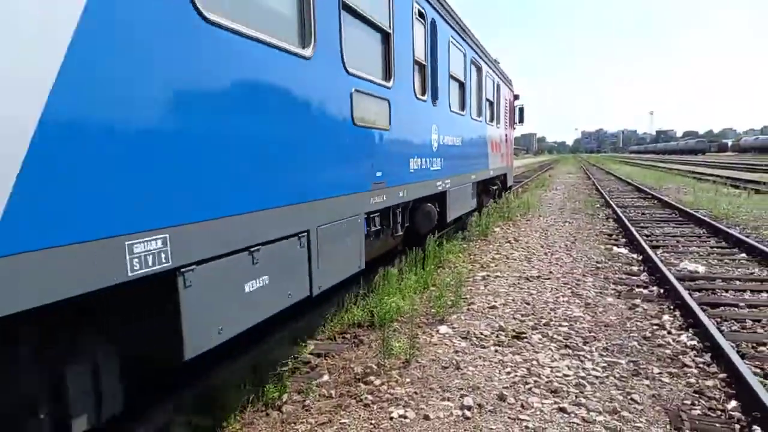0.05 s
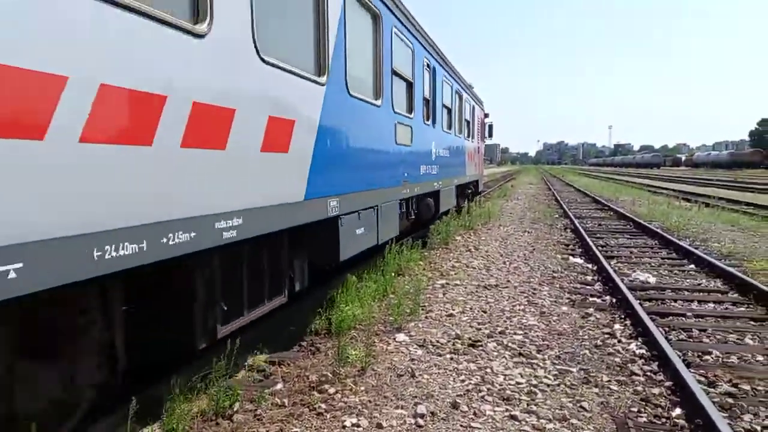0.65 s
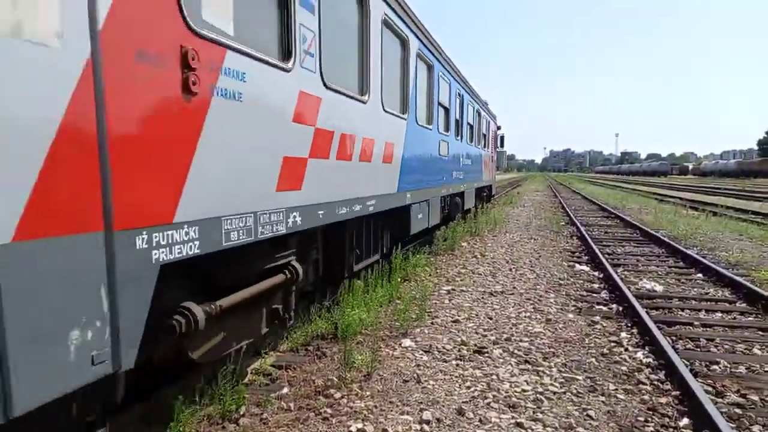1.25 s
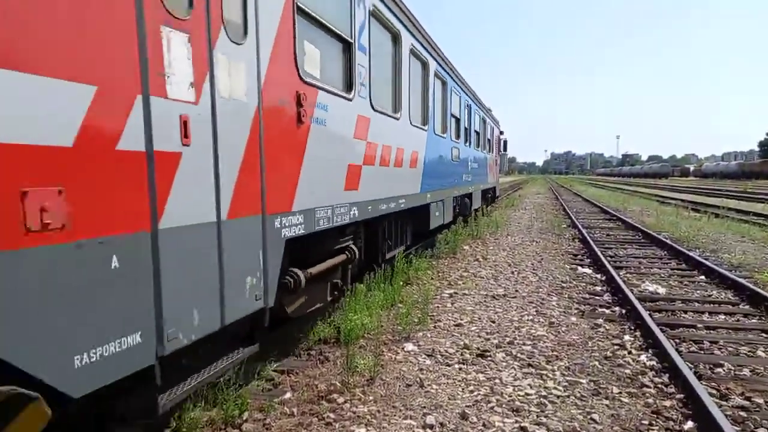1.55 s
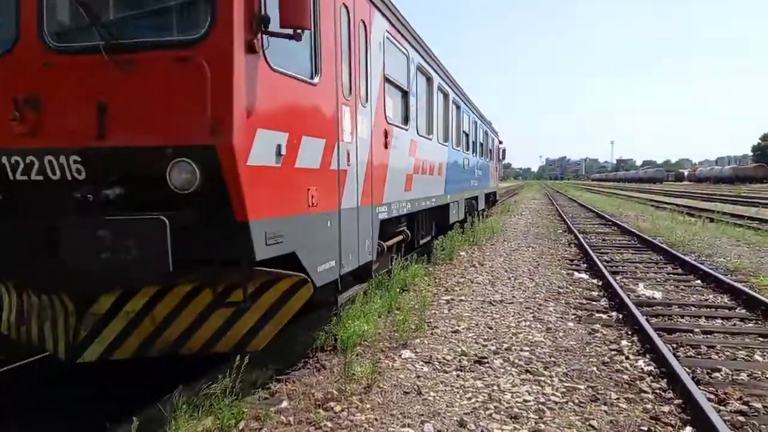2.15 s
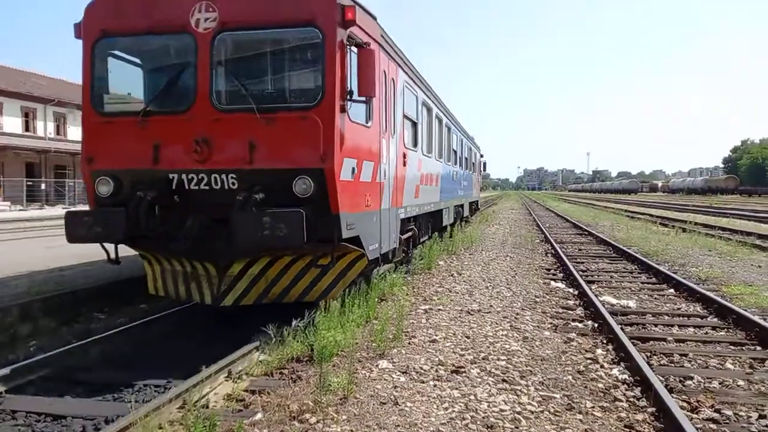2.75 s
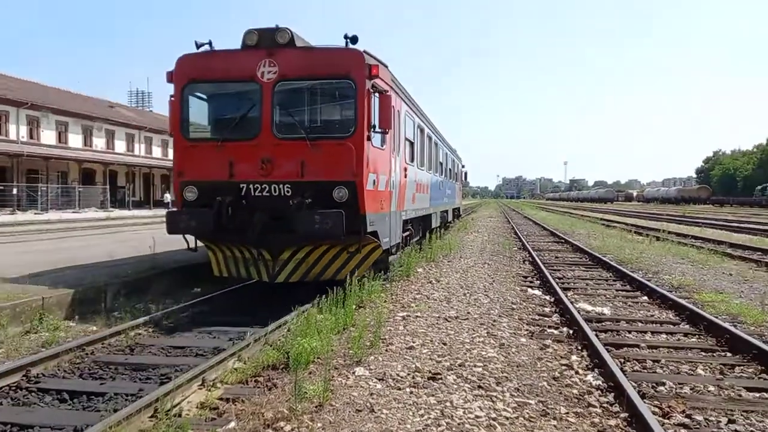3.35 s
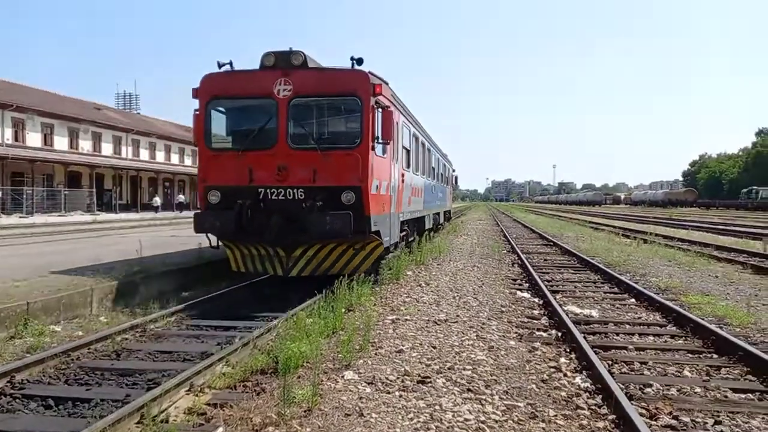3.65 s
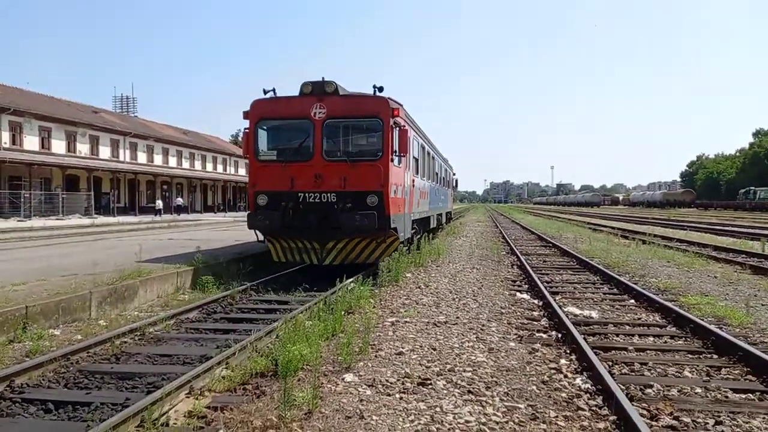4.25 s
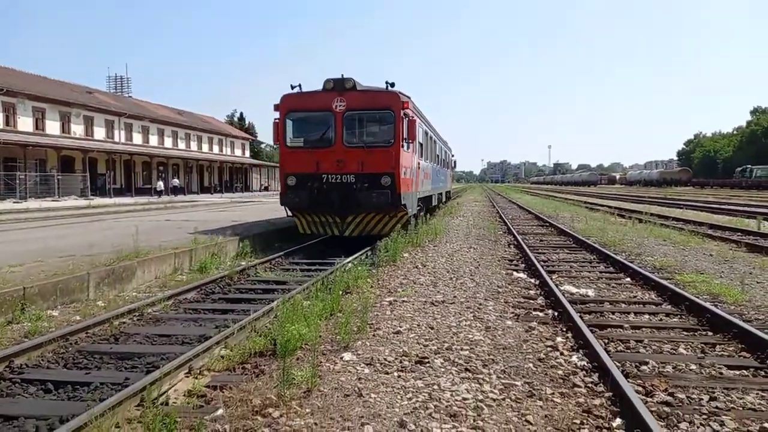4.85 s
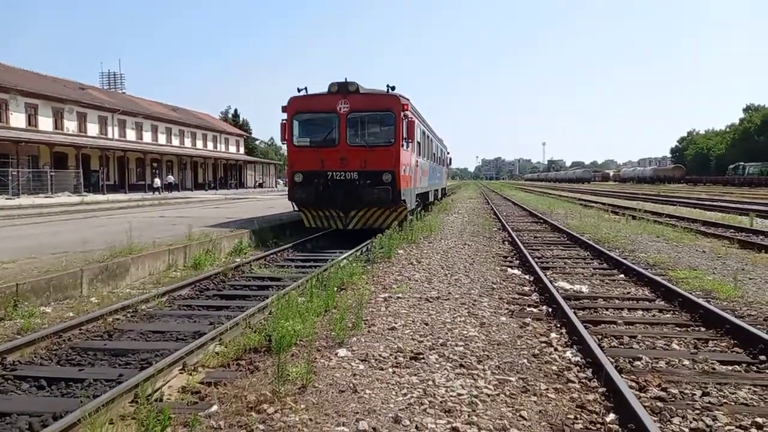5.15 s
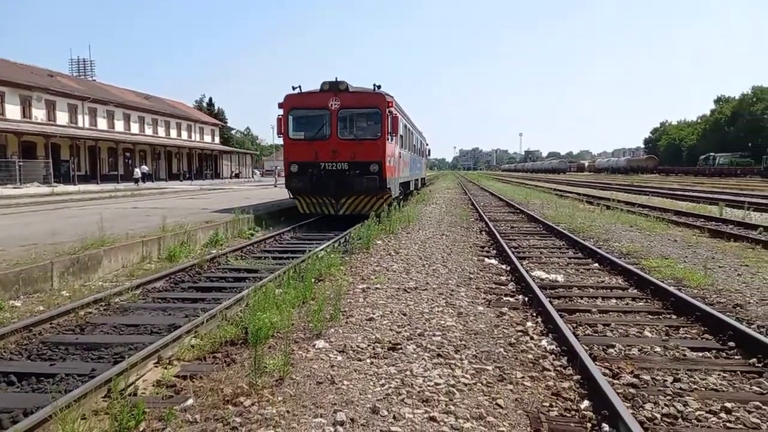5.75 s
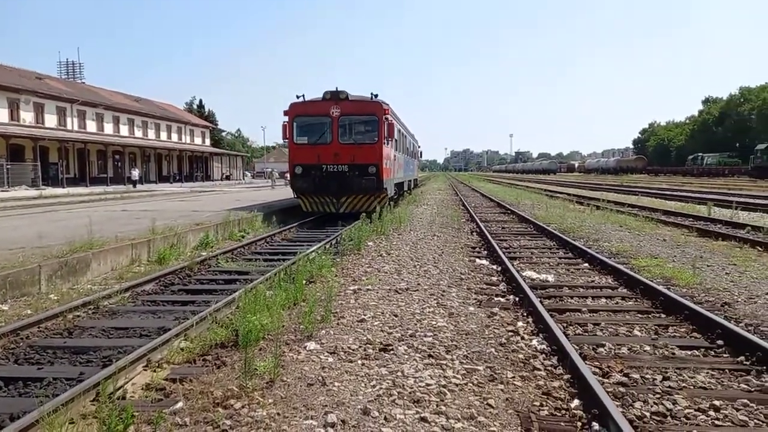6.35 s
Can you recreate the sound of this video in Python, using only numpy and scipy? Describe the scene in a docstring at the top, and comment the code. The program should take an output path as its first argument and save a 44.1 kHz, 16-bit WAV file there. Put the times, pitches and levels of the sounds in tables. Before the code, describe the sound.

A diesel railcar rolls slowly past in an open station yard, very close on the microphone's left. Its engine drones and surges over a chugging exhaust, with metallic clatter, jangling fittings and a brief hiss of air. The wheels roar, ring and knock lightly on the rail. As it draws away the sound softens, a fan's hiss and thin whine emerge, and a faint, high wheel squeal flickers near the end.

```python
"""In a station yard a diesel railcar rolls slowly past on the left, an arm's length away, and draws off. Uneven
cylinder firings drive the resonances of engine and underbody into a drone; the exhaust chugs, the casing
clatters, loose fittings jangle and air hisses. Rail roughness makes the wheels roar and ring. With distance the
levels fall, and the engine's pitch sags as it slows. A fan's hiss and thin whine emerge behind the car, and
friction between flange and rail raises a faint squeal."""
import sys
import numpy as np
from scipy import signal
from scipy.fft import rfft, irfft
from scipy.io import wavfile
from scipy.ndimage import uniform_filter1d, map_coordinates

SR = 44100
rng = np.random.default_rng(int(sys.argv[2]) if len(sys.argv) > 2 else 0)


def store_pcm(level_fs):
    """Save levels as 16-bit WAV."""
    pcm = np.round(np.clip(level_fs, -1, 1) * 32767).astype(np.int16)
    wavfile.write(sys.argv[1], SR, np.atleast_2d(pcm).T)


N = 291501
T = np.arange(N) / SR
F = np.arange(N // 2 + 1) * SR / N + 1e-3  # Hz, kept just above zero

# direction of the car: (time [s], lag of the right channel [ms], left minus right level [dB])
BEARING = [(0, 0.37, -1), (.6, 0.38, -1.5), (1.1, 0.34, -1), (1.85, 0.2, -1), (2.2, 0.06, -1.5),
           (3.2, 0.072, -1.5), (6.61, 0.06, -1.5)]
# modes of wheel and rail: (frequency [Hz], width [Hz], gain [dB])
WHEEL_MODES = [(930, 16, -6), (1156, 59, 4), (1570, 430, 5), (1830, 33, 6), (2412, 130, 6.5),
               (3080, 120, 0.5), (3745, 100, 3.5)]
# rough stretches of rail: (time [s], half length [s], rise in singing [dB], rise in roar [dB])
GRINDS = [(1.455, 0.034, 3, 1), (1.673, 0.08, 8.5, 2), (2.53, 0.025, -5, 3.5), (2.853, 0.049, -2, 3.5),
          (3.706, 0.15, 5, 4), (4.05, .06, 7, 2), (4.342, 0.13, 6, 1.5), (4.8, 0.021, 13, 2),
          (4.987, 0.073, 7, 3), (5.27, 0.036, -9, 5.5), (5.732, .05, 11, 0.5), (6.092, 0.055, 14, -0.5)]


def undb(db):
    """Amplitude ratio of a level in decibels."""
    return 10 ** (np.asarray(db) / 20)


def curves(table):
    """Linear interpolation in time: one curve for each column after the first."""
    times, *columns = np.transpose(table)
    return [np.interp(T, times, column) for column in columns]


def unit(x):
    """Normalisation to rms 1."""
    return x / np.sqrt(np.mean(x ** 2))


def bell(s, half_s):
    """Gaussian envelope that peaks at 1 at time s."""
    return np.exp(-((T - s) / half_s) ** 2 / 2)


def walk(rate):
    """Random modulation: values held for 1 / rate seconds and smoothed twice; rms 1."""
    hold = int(SR / rate)
    held = rng.standard_normal(N)[np.arange(N) // hold]
    return unit(uniform_filter1d(uniform_filter1d(held, hold), hold))


def steady(x, span_s):
    """Envelope flattening: division by the running rms evens out the power."""
    power = uniform_filter1d(np.atleast_2d(x) ** 2, int(span_s * SR) + 1).mean(axis=0)
    return unit(x / np.sqrt(power + 1e-9))


def colour(x, points, peaks=()):
    """Spectral shaping: a broad envelope with Lorentzian resonance peaks on it; rms 1."""
    hz, db = np.transpose(points)
    gain_db = np.interp(np.log(F), np.log(hz), db)
    for centre, width, rise in peaks:
        gain_db = gain_db + rise / (1 + (2 * (F - centre) / width) ** 2)
    skirts = np.minimum(F / hz[0], 1) ** 2 * np.minimum(hz[-1] / F, 1) ** 2
    return unit(irfft(rfft(x) * undb(gain_db) * skirts, N))


def ring(x, modes):
    """Forced resonance: each mode responds as two resonators in series; rms 1."""
    response = sum(undb(db) / (1 + 1j * hz / (1.175 * width) * (F / hz - hz / F)) ** 2
                   for hz, width, db in modes)
    return unit(irfft(rfft(x) * response, N))


def flickering_modes(x, modes, depth_db, rate):
    """Forced resonance in which the level of each mode fluctuates independently."""
    return sum(ring(x, [(hz, width, 0)]) * undb(db + depth_db * walk(rate)) for hz, width, db in modes)


def patchy(x, depth_db, rate):
    """Amplitude modulation by band: each flickers on its own, while the top band stays smooth."""
    spectrum = rfft(x)
    band = np.digitize(F, np.geomspace(1500, 9000, num=13))
    top = irfft(spectrum * (band == band.max()), N)
    lower = sum(irfft(spectrum * (band == k), N) * undb(depth_db * walk(rate))
                for k in np.unique(band)[:-1])
    return unit(top + lower)


def wander(x, spread, rate):
    """Frequency modulation: the pitch strays by a small fraction as the contact shifts."""
    stray = walk(rate)
    index = np.cumsum(1 + spread * (stray - stray.mean()))
    return np.array([map_coordinates(channel, [index], order=3, mode="mirror") for channel in x])


def delayed(x, ms):
    """Propagation delay that varies with time."""
    return map_coordinates(x, [np.arange(N) - ms * SR / 1000], order=3, mode="nearest")


def place(x, abreast=1):
    """Time and level cues of direct sound: it reaches the left first, the more so the further abreast."""
    lag_ms, pan_db = curves(BEARING)
    return np.array([x * undb(pan_db / 2), delayed(x, lag_ms * abreast) * undb(-pan_db / 2)])


def scattered(gap_m=0.17):
    """Diffuse noise at two points: coherent in the bass, unrelated in the treble."""
    coherence = .9 * np.sinc(2 * F * gap_m / 343)
    mid, side = irfft(rfft(rng.standard_normal((2, N))) * np.sqrt([1 + coherence, 1 - coherence]), N)
    return unit(np.array([mid + side, mid - side]))


def field(scatter_db, abreast=1):
    """Superposition of direct noise and noise scattered by ballast and underbody."""
    pan_db = curves(BEARING)[1]
    echoes = scattered() * undb(np.array([pan_db, -pan_db]) / 4)
    return unit(place(rng.standard_normal(N), abreast) + undb(scatter_db) * echoes)


def passing(db, ahead_m, nearest_m, doubling_db, screen_db):
    """Spreading loss and screening: the level [dB] of a source ahead_m in front of the car's rear end."""
    speed_m_s, rear_passes_s, fade_s = 3.71, 1.476, 0.15
    along_m = ahead_m + speed_m_s * (T - rear_passes_s)
    doublings = np.log2(np.hypot(along_m, nearest_m) / nearest_m)
    screened = np.clip((T - rear_passes_s) / fade_s, 0, 1)
    return db - doubling_db * doublings - screen_db * screened


def ground(x, rough_hz=4200):
    """Interference: an inverted grazing reflection hollows the sound; ballast scatters its top away."""
    # ground reflection: (time [s], extra delay [ms], amplitude relative to direct sound [ratio])
    reflection = [(0, 1.42, 0.02), (1.2, 1.48, 0.2), (2.1, 1.51, .6), (3.6, 1.555, .55), (6.61, 1.575, .52)]
    ms, share = curves(reflection)
    bounced = irfft(rfft(x) / (1 + (F / rough_hz) ** 6), N)
    return np.array([direct - share * delayed(back, ms) for direct, back in zip(x, bounced)])


def firings(engine_speed, nominal_hz=34.23, jitter=.14, spread_db=4.5, decay_cycles=0.3):
    """Pulse excitation: each uneven cylinder firing is a jump in pressure and an exponential decay."""
    cycles = np.cumsum(nominal_hz * engine_speed * (1 + jitter * walk(40))) / SR
    strength = undb(spread_db * rng.standard_normal(size=1024))[cycles.astype(int)]
    return unit(strength * np.exp(-(cycles % 1) / decay_cycles))


def drone(pressure, pitch, modes, db, gas_db=2, diffuse_db=-9):
    """Forced vibration: firings and turbulent gas drive a set of modes, shifted by the pitch factor."""
    knocks = ring(np.diff(pressure, prepend=pressure[0]), modes)
    gas = undb(gas_db) * ring(pressure * rng.standard_normal(N), modes)
    evened = steady(knocks + gas, span_s=0.036)  # the flywheel evens out the power between cycles
    shifted = np.interp(np.cumsum(pitch), np.arange(N), evened)
    return (place(shifted) + undb(diffuse_db) * ring(scattered(), modes)) * undb(db)


def engine(pressure, engine_speed, lope_db=1.3, lope_rate=22):
    """Structural resonance: boom and upper drone surge and sag in pitch; the gearbox modes stay put."""
    # modes of underbody, engine and gearbox: (frequency [Hz], width [Hz], gain [dB])
    boom_modes = [(148.8, 27.8, 10.5), (109.6, 56, -2), (182, 50, -1.5), (89, 76, -10.5)]
    upper_modes = [(228, 16, -.5), (243, 14, 0), (310, 60, -19)]
    gearbox_modes = [(387, 31, 5), (481, 65, -8.5)]
    # surges: (time [s], half length [s], rise in boom [dB], rise in upper drone [dB])
    surges = [(0.432, 0.063, 5, -0.5), (0.684, 0.041, 3.5, 8), (0.826, 0.036, 4.5, 9.5),
              (1.142, 0.069, 9, 3), (1.368, 0.029, 0.5, 5), (1.578, 0.034, 6, -2), (1.754, 0.026, 10, 8),
              (1.946, 0.026, 4, 5), (2.108, 0.049, 6.5, 9), (2.294, 0.06, -0.5, 6), (2.437, 0.021, -8, 8.5),
              (2.555, 0.05, 2, 6), (2.708, 0.037, 4.5, 11.5), (3.031, 0.028, -4, 13.5),
              (3.346, 0.088, 6, 6), (3.632, 0.0165, 2, 9), (3.82, 0.017, 12, 5), (4.387, 0.036, 9, 7.5),
              (4.642, 0.014, 4, 8), (4.862, 0.025, 6, -7), (5.24, 0.076, -4, 9), (5.883, 0.011, 2, 13),
              (6.555, 0.031, -10, 11)]
    # gearbox hum: (time [s], level [dB])
    gearbox_level = [(0, -33), (.45, -35.5), (1, -31.5), (1.5, -42.5), (2.1, -42), (2.8, -45), (3.5, -51),
                     (4.5, -56.5), (6.61, -70)]
    boom_db = passing(-26.5, ahead_m=3, nearest_m=1.97, doubling_db=6.5, screen_db=0.5)
    boom_db += sum(db * bell(s, half_s) for s, half_s, db, _ in surges)
    upper_db = passing(-28, ahead_m=2.5, nearest_m=4, doubling_db=9, screen_db=1.7)
    upper_db += sum(db * bell(s, half_s) for s, half_s, _, db in surges)
    layers = [(boom_modes, engine_speed, boom_db), (upper_modes, engine_speed, upper_db),
              (gearbox_modes, np.ones(N), curves(gearbox_level)[0])]
    return sum(drone(pressure, pitch, modes, db + lope_db * walk(lope_rate))
               for modes, pitch, db in layers)


def exhaust(rise_s=0.0089, dull_db_per_s=1.8):
    """Pulsating gas flow: a throbbing rumble and uneven chuffs; far off, the pipe's resonance leads."""
    # spectra of rumble and chuffs: (frequency [Hz], relative density [dB])
    rumble_spectrum = [(20, -14), (30, -6.5), (42, -5), (60, 0.5), (85, -0.5), (120, -1.5), (175, -11.5),
                       (225, -1.5), (300, -10), (450, -18), (900, -61)]
    chuff_spectrum = [(25, -30), (55, -10), (90, 6.5), (140, -3.5), (180, -4.5), (235, -14.5), (300, -12.5),
                      (450, -23.5), (1000, -27), (3000, -58)]
    # tailpipe modes: (frequency [Hz], width [Hz], gain [dB])
    pipe_modes = [(77, 49, 0), (169, 66, -9.5)]
    # puffs of gas: (time [s], relative level [dB], length [s])
    chuffs = [(.08,-32,.06), (.203,-27,.05), (.35,-30,.05), (.475,-27,.075), (.63,-27,.06), (.72,-26.5,.06),
              (.853,-26,.1), (1.146,-29,.06), (1.235,-28,.04), (1.33,-28,.13), (1.565,-29,.07),
              (1.69,-32,.05), (1.775,-31,.04), (1.905,-25.5,.055), (2.05,-29.5,.085), (2.203,-26.5,.035),
              (2.255,-30,.04), (2.52,-31,.025), (2.59,-29,.065), (2.808,-27,.03), (2.868,-27.5,.06),
              (3.025,-28.5,.04), (3.11,-34,.025), (3.192,-25,.035), (3.275,-29,.035), (3.337,-24.5,.028),
              (3.425,-28,.03), (3.512,-27,.068), (3.6,-31,.06), (3.755,-28.5,.065), (3.94,-35,.04),
              (4.015,-37,.035), (4.132,-29.5,.085), (4.315,-37,.03), (4.39,-34,.04), (4.55,-32,.04),
              (4.645,-35,.075), (4.8,-34,.03), (4.843,-28.5,.035), (4.97,-38,.04), (5.048,-36,.035),
              (5.19,-35,.055), (5.325,-35,.08), (5.485,-34.5,.04), (5.603,-32,.045), (5.708,-33,.055),
              (5.893,-35.5,.035), (5.96,-37.5,.028), (6.045,-32.5,.1), (6.408,-32.5,.04), (6.54,-36.5,.08)]
    gas = lambda: place(rng.standard_normal(N)) + undb(-1.5) * rng.standard_normal((2, N))
    envelope = np.zeros(N)
    for s, db, length_s in chuffs:
        age = np.clip(T - s, 0, 2 * length_s)
        envelope += undb(db) * np.minimum(age / rise_s, 1) * np.exp(-(age / length_s) ** 4)
    rumble_db = passing(-33, ahead_m=-7, nearest_m=1, doubling_db=2.5, screen_db=0.5)
    rumble = steady(colour(gas(), rumble_spectrum), 0.035) * undb(rumble_db + 0.5 * walk(21))
    away_db = dull_db_per_s * np.maximum(T - 3.5, 0)
    chuff = steady(colour(gas(), chuff_spectrum), 0.0234) * undb(-away_db)
    boom = steady(ring(gas(), pipe_modes), .03) * undb(away_db - 4)
    return rumble + (chuff + boom) * envelope


def clatter(pressure, beat_depth=0.18, crossover_hz=3000):
    """Structure-borne noise: injectors and valve gear rattle the casing in time with the firings."""
    # rattle: (frequency [Hz], relative density [dB])
    spectrum = [(900, -18), (1800, -2.5), (2400, 2), (3200, 0.5), (4200, 0), (5300, -5.5), (6500, -8),
                (7900, -9), (9300, -14), (12500, -17.5), (15500, -25)]
    # casing resonances: (frequency [Hz], width [Hz], rise [dB])
    casing_peaks = [(2290, 300, 2.5), (3564, 51, 5.5), (3813, 90, 7), (4100, 19, 8), (4490, 70, 7),
                    (4840, 41, 1), (7560, 200, 2)]
    # the lower rattle comes more directly, the treble after bouncing about under the floor
    low_share = 1 / (1 + (F / crossover_hz) ** 4)
    noise = irfft(rfft(field(-0.5)) * np.sqrt(low_share) + rfft(field(18)) * np.sqrt(1 - low_share), N)
    rattle = colour(noise * (1 + beat_depth * pressure), spectrum, casing_peaks)
    level_db = passing(-28.5, ahead_m=3.5, nearest_m=1.33, doubling_db=5, screen_db=0.5)
    return patchy(rattle, depth_db=2, rate=55) * undb(level_db)


def jangle(steel_db, low_hz=2050, high_hz=5200, rise_s=.002, decay_s=0.042, range_db=8, count=600):
    """Damped free vibration: loose fittings tap at random, each tap ringing at its own pitch."""
    age = T[:SR // 8]
    envelope = np.minimum(age / rise_s, 1) * np.exp(-age / decay_s)
    taps = np.zeros((2, N + len(age)))
    for when, pitch, size, right_phase in rng.random((count, 4)):
        start, hz = int(when * N), low_hz * (high_hz / low_hz) ** pitch
        tone = np.sin(2 * np.pi * (hz * age + np.array([[0], [right_phase]])))
        taps[:, start:start + len(age)] += undb(range_db * size) * low_hz / hz * envelope * tone
    return unit(taps[:, :N]) * undb(steel_db - 4)


def ringing(steel_db):
    """Modal vibration of shaken steel under the floor: the energy shifts from mode to mode."""
    # underfloor steel: (frequency [Hz], width [Hz], relative level [dB])
    steel_modes = [(2340, 130, -9), (2607, 37, 6.5), (2850, 87, -3), (3235, 130, 3.5), (3805, 290, 0),
                   (4194, 18, -8), (4540, 44, -16), (5130, 140, -2.5)]
    shaken = flickering_modes(field(-4), steel_modes, depth_db=1, rate=24)
    return steady(shaken, 0.047) * undb(steel_db)


def cooling_fan(waver=0.01184, rasp=0.51):
    """Broadband and tonal fan noise: an uneven hiss through the cowl over a thin, wavering whine."""
    # hiss: (frequency [Hz], relative density [dB])
    spectrum = [(900, -10), (1500, -7), (2100, -3), (2400, -16), (2570, -17), (2850, -4), (3130, -1),
                (3500, 4), (3900, 4), (4300, -8.5), (5000, -8), (7500, -5), (9500, -14), (13000, -20)]
    # cowl resonances: (frequency [Hz], width [Hz], rise [dB])
    cowl_peaks = [(1700, 90, -3.5), (3220, 160, 8.5), (4500, 250, 4), (5250, 160, 1), (5650, 970, 1.5),
                  (6670, 1200, -3.5), (7950, 580, 2.5)]
    # the hiss as the fan comes into view behind the car: (time [s], level [dB])
    hiss_level = [(0, -63), (1.3, -79), (2.5, -43), (3.15, -46.5), (3.65, -42), (4.3, -45), (5.03, -43),
                  (5.3, -44.5), (5.7, -44.5), (6.61, -47.5)]
    # whine: (time [s], frequency [Hz], level [dB])
    whine_track = [(0, 532, -63), (2, 493.3, -53), (3.6, 497.4, -50), (4.6, 497, -48.5),
                   (5.25, 494.7, -49.5), (6.61, 497, -53)]
    hz, whine_db = curves(whine_track)
    cycles = np.cumsum(hz * (1 + waver * walk(50))) / SR
    whine = np.sin(2 * np.pi * cycles) * (1 + rasp * walk(45))
    hiss = patchy(colour(field(3.2), spectrum, cowl_peaks), depth_db=1.75, rate=40)
    return hiss * undb(curves(hiss_level)[0] + 1.3 * walk(9)) + place(whine * undb(whine_db))


def air_hiss():
    """Flow noise: air hisses under the floor alongside, flares at the car's rear end and stops short."""
    # hiss: (frequency [Hz], relative density [dB])
    spectrum = [(4000, -4), (7500, 0), (9500, -2), (12500, -5), (15500, -9)]
    # its course: (time [s], level [dB])
    hiss_level = [(0, -58), (.4, -42.5), (.78, -51), (.88, -61), (1.35, -54), (1.69, -46), (1.73, -62),
                  (1.8, -90)]
    return colour(field(11), spectrum) * undb(curves(hiss_level)[0] + 1.3 * walk(34))


def wheel_roar(roar_db, leave_s=2.32, gone_s=3.02):
    """Rolling noise: rail roughness roars in the bogies and grows duller with distance."""
    # roar from near and from far: (frequency [Hz], relative density [dB])
    near_spectrum = [(150, 8), (330, 3), (480, -3.5), (560, -5), (660, -0.5), (820, -1), (1050, -3),
                     (1300, -7), (1800, -6.5), (2600, -19), (6000, -40)]
    far_spectrum = [(150, -17), (320, -6.5), (440, -1), (620, 6.5), (790, 6.5), (920, -6), (1020, 0),
                    (1400, -9), (1900, -7), (3000, -53), (6000, -39)]
    far_share = np.clip((T - leave_s) / (gone_s - leave_s), 0, 1)
    near = colour(field(-7, abreast=.75), near_spectrum) * np.sqrt(1 - far_share) * undb(5)
    far = colour(field(-6, abreast=1.1), far_spectrum) * np.sqrt(far_share) * undb(1)
    return (near + far) * undb(roar_db + .7 * walk(20))


def wheel_singing(settled_s=2.9, fade_db_per_s=32, rest_db=-6):
    """Resonance of wheel and rail: they sing while near, then settle, and flare where they grind."""
    level_db = passing(-37.5, ahead_m=2, nearest_m=4, doubling_db=6.5, screen_db=3.1)
    level_db += np.clip((settled_s - T) * fade_db_per_s, rest_db, 0)
    level_db += sum(db * bell(s, half_s) for s, half_s, db, _ in GRINDS)
    singing = wander(ring(field(2.3), WHEEL_MODES), spread=0.00808, rate=14)
    return singing * undb(level_db + walk(24.78))


def grit(roar_db):
    """Crushing noise: grit under the wheels gives a fine high hiss that follows their roar."""
    # hiss: (frequency [Hz], relative density [dB])
    spectrum = [(7000, -0.5), (9500, -8), (12500, 3), (15500, -13)]
    return colour(field(10), spectrum) * undb(roar_db - 17)


def growl():
    """Frame resonance: the bogie growls in its own modes as it rolls by."""
    # bogie frame: (frequency [Hz], width [Hz], gain [dB])
    bogie_modes = [(810, 50, 0), (894, 61, -1), (995, 52, -0.52)]
    # growl: (time [s], level [dB])
    growl_level = [(0, -46), (.5, -40), (1.05, -34), (1.3, -37), (1.47, -34), (1.75, -46), (2.8, -49.5),
                   (3.3, -56), (6.61, -75)]
    return ring(field(0, abreast=0.44), bogie_modes) * undb(curves(growl_level)[0] + 1.5 * walk(25))


def pings(waver=.0035, rasp=.6, phase_spread_rad=1.3):
    """Single modes of steel sing out for an instant; echoes put the two channels out of phase."""
    # tones of underfloor steel and wheels: (time [s], frequency [Hz], level [dB], half length [s])
    notes = [(0.276, 3900, -37, .03), (0.317, 5190, -38.5, 0.027), (0.46, 4270, -27, 0.026),
             (0.548, 2594, -33, 0.035), (0.867, 2610, -28.5, 0.018), (1.04, 5170, -42, 0.027),
             (1.11, 5160, -42, 0.022), (1.2, 1496, -41, 0.021), (2.057, 1500, -42, .02),
             (2.28, 1806, -43, .045), (2.396, 3080, -46, 0.05), (2.522, 1830, -40.5, 0.02),
             (2.717, 1830, -40, 0.032), (2.893, 1841, -44, .025)]
    wavering_s = np.cumsum(1 + waver * walk(89.2)) / SR
    phase = phase_spread_rad * np.array([walk(25.1), walk(24.6)])
    tones = sum(np.sin(2 * np.pi * hz * wavering_s + phase) * undb(db) * bell(s, half_s)
                for s, hz, db, half_s in notes)
    return tones * (1 + rasp * walk(150)) * undb(-1)


def rubbed_steel(events, width_hz, scatter_db):
    """Frictional excitation: each event swells and fades in one narrow resonance."""
    rub = field(scatter_db)
    tone = lambda hz: steady(ring(rub, [(hz, width_hz, 0)]), 2 / width_hz)
    return sum(tone(hz) * undb(db) * bell(s, half_s) for s, hz, db, half_s in events)


def scrapes():
    """Sliding friction: the wheels chafe in short bursts of narrow-band noise."""
    # scrapes: (time [s], frequency [Hz], level [dB], half length [s])
    events = [(.32, 2290, -34, 0.046), (.5, 3800, -30, .025), (.54, 2630, -34, .035),
              (.62, 2390, -40, 0.035), (.655, 3520, -31, 0.018), (.7, 2080, -38, 0.041),
              (1.645, 1610, -35, 0.04), (2.53, 1480, -46, 0.028)]
    return rubbed_steel(events, width_hz=220, scatter_db=2)


def clacks(rise_s=0.0029, decay_s=0.017):
    """Impact excitation: a wheel knocks over a flaw in the rail, with a crack that rings its modes."""
    # impacts: (time [s], level [dB])
    impacts = [(1.635, -39), (2.508, -34.5), (2.8, -39)]
    # crack: (frequency [Hz], relative density [dB])
    spectrum = [(700, -8), (2000, 0), (5000, -10), (14000, -24)]
    ages = [(np.maximum(T - s, 0), db) for s, db in impacts]
    envelope = sum(undb(db) * np.minimum(age / rise_s, 1) * np.exp(-age / decay_s) for age, db in ages)
    noise = field(0)
    return unit(colour(noise, spectrum) + undb(2) * ring(noise, WHEEL_MODES)) * envelope


def chirr(db=-58.5, from_s=3.3, rise_s=.15):
    """Light flange friction keeps high wheel modes chirring once the car has drawn clear."""
    # high wheel modes: (frequency [Hz], width [Hz], relative level [dB])
    high_modes = [(6690, 70, 4), (7700, 170, -5)]
    chirring = flickering_modes(field(0), high_modes, depth_db=2.5, rate=45)
    return unit(chirring) * undb(db) * np.clip((T - from_s) / rise_s, 0, 1)


def squeal(waver=0.007, flutter_db=1.5):
    """Friction-driven vibration: a flange rubs the rail in a thin rasping tone that flares and slips."""
    # rubbing flange: (time [s], frequency [Hz], level between bursts [dB])
    flange_track = [(3.2, 8000, -85), (3.4, 8000, -70), (5, 7800, -68), (5.3, 8180, -49.5),
                    (5.45, 8240, -58), (6.61, 8230, -64)]
    # bursts of the tone: (time [s], level [dB], half length [s])
    bursts = [(3.442, -54, .04), (3.57, -57, .03), (4.342, -65, .04), (4.66, -67, .03), (4.8, -53, 0.021),
              (5.134, -61, .03), (5.306, -51, 0.019), (5.395, -51, 0.024), (5.618, -60, 0.033),
              (5.75, -55, 0.019), (5.87, -62, 0.04), (6.227, -51, 0.017), (6.365, -53, 0.028),
              (6.478, -53, .015)]
    # rough slips: (time [s], frequency [Hz], level [dB], half length [s])
    slips = [(5.932, 8360, -43.5, 0.018), (5.99, 8020, -36.5, 0.012), (6.08, 8080, -48, 0.081),
             (6.528, 8030, -46, 0.025), (6.603, 7950, -32.5, 0.0081)]
    hz, rub_db = curves(flange_track)
    tone = np.sin(2 * np.pi * np.cumsum(hz * (1 + waver * walk(550))) / SR)
    envelope = undb(rub_db) + sum(undb(db) * bell(s, half_s) for s, db, half_s in bursts)
    envelope *= undb(flutter_db * walk(60))
    rasping = tone * (1 + walk(220))
    return place(rasping * envelope, abreast=0.46) + rubbed_steel(slips, width_hz=300, scatter_db=3)


def scene():
    """Superposition: engine, exhaust, fan and wheels move off together."""
    # engine speed: (time [s], pitch factor [ratio])
    engine_speed_track = [(0, 1), (.8, 1), (1.3, 1.02), (2.2, .97), (6.61, .935)]
    engine_speed = curves(engine_speed_track)[0]
    pressure = firings(engine_speed)
    steel_db = passing(-38.5, ahead_m=2.5, nearest_m=0.97, doubling_db=4.5, screen_db=8)
    roar_db = passing(-30.5, ahead_m=3.5, nearest_m=1.96, doubling_db=5, screen_db=1.5)
    roar_db += sum(db * bell(s, half_s) for s, half_s, _, db in GRINDS)
    machinery = ground(clatter(pressure) + jangle(steel_db) + ringing(steel_db) + cooling_fan())
    air = air_hiss()
    rolling = wheel_roar(roar_db) + wheel_singing() + grit(roar_db) + growl()
    steel = pings() + scrapes() + clacks() + chirr() + squeal()
    return engine(pressure, engine_speed) + exhaust() + machinery + air + rolling + steel


def record(dry):
    """Band limiting: a steep low-pass filter cuts the top above 15.7 kHz."""
    return signal.sosfilt(signal.ellip(10, .2, 80, 15700, fs=SR, output="sos"), dry)


dry = scene()
out = record(dry)
store_pcm(out)
```